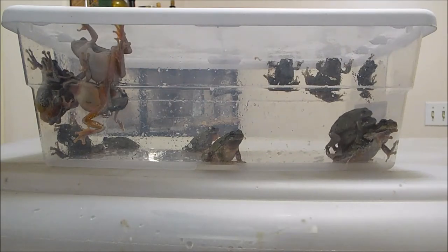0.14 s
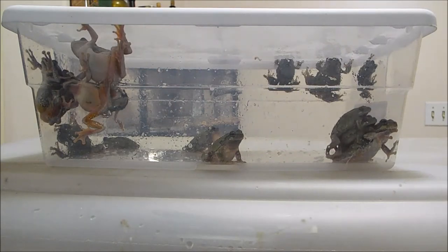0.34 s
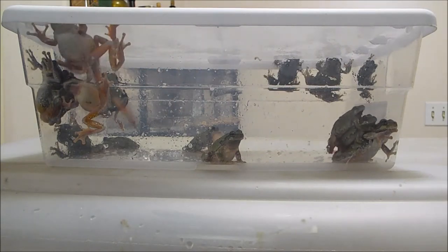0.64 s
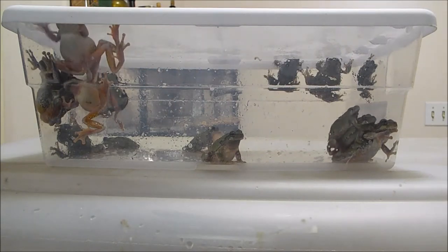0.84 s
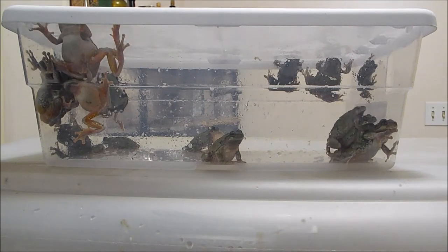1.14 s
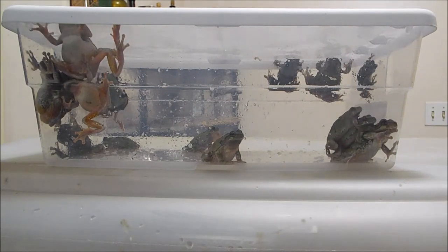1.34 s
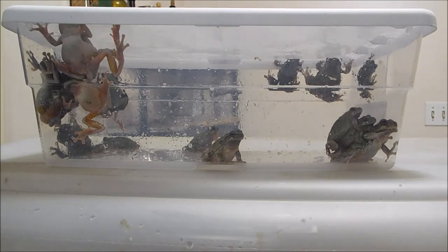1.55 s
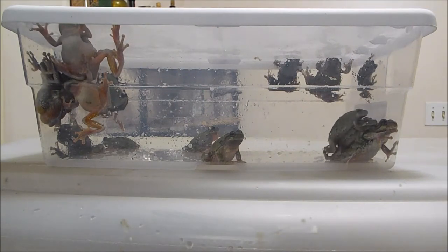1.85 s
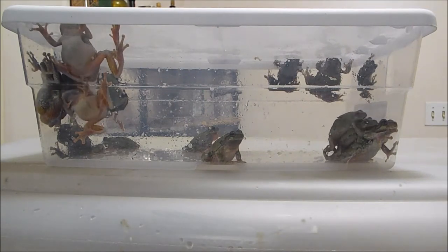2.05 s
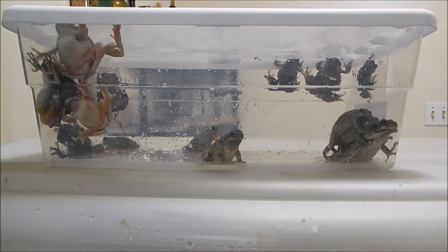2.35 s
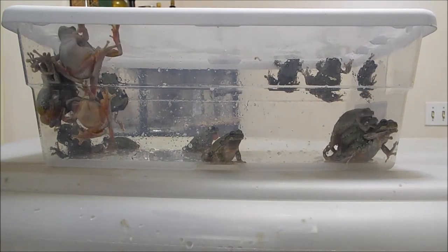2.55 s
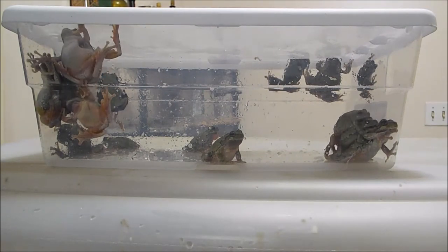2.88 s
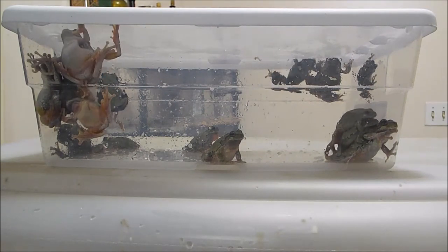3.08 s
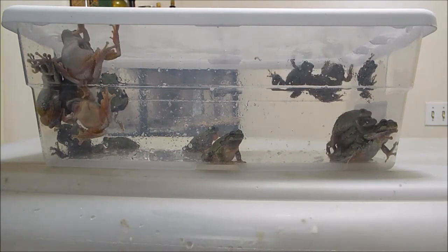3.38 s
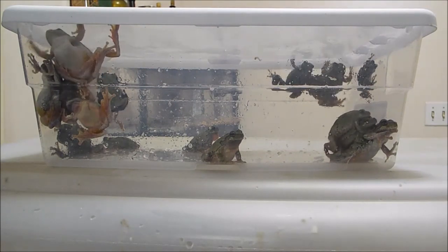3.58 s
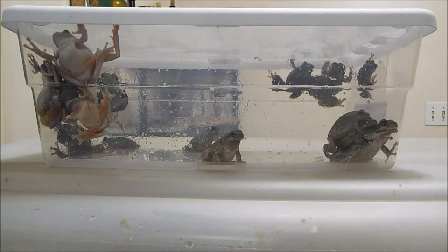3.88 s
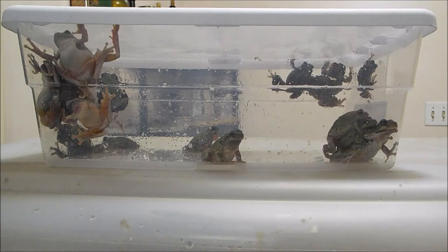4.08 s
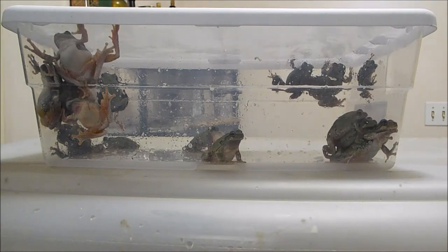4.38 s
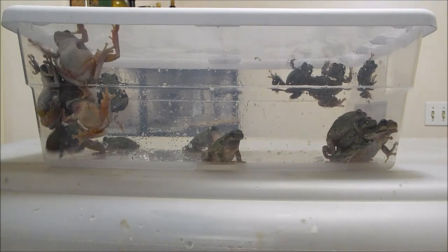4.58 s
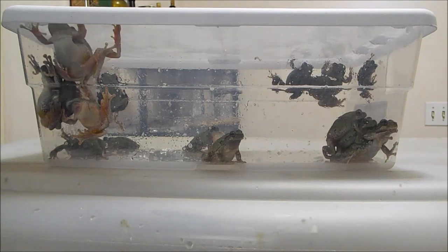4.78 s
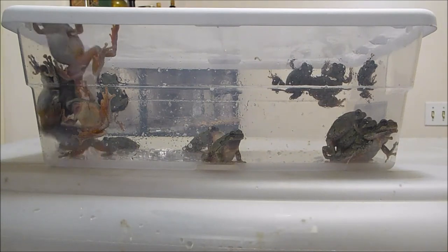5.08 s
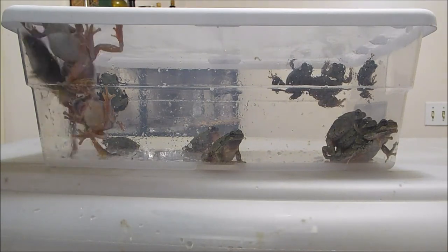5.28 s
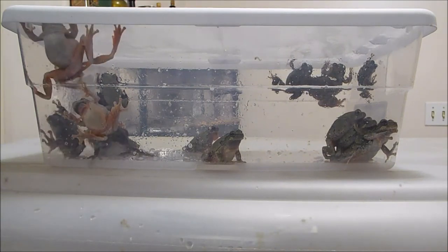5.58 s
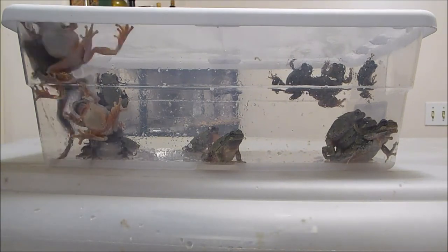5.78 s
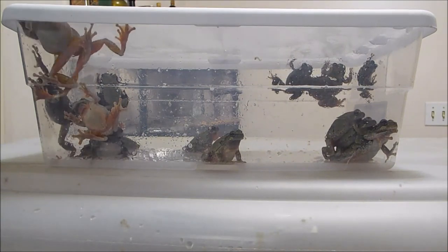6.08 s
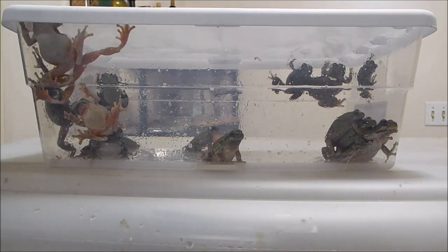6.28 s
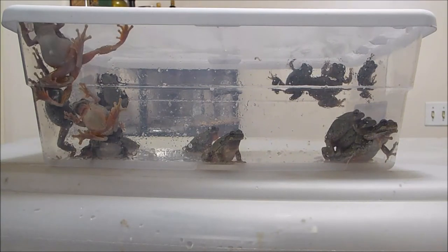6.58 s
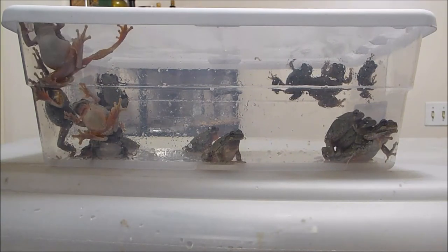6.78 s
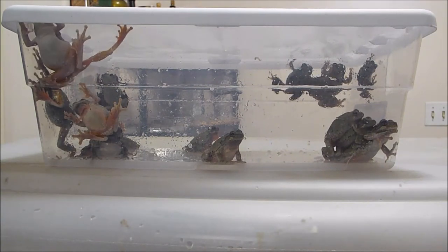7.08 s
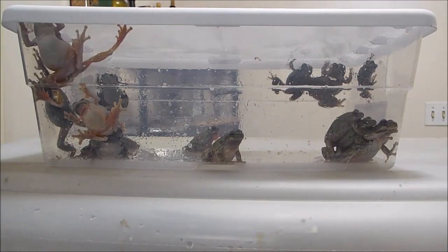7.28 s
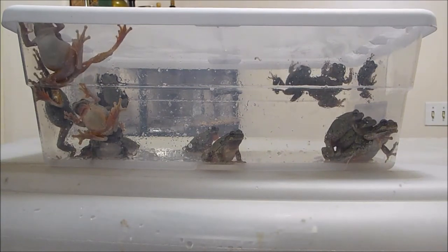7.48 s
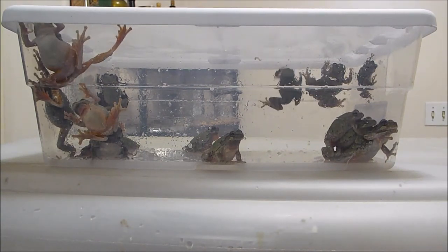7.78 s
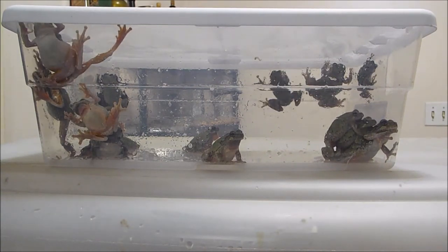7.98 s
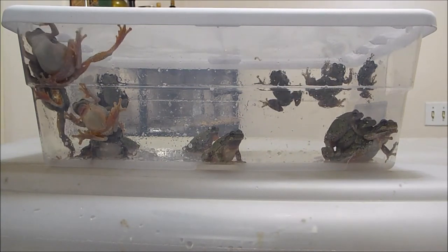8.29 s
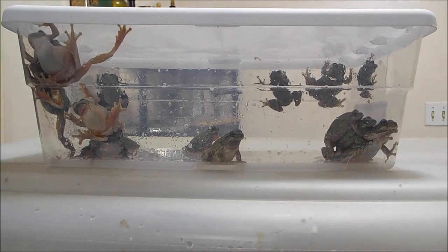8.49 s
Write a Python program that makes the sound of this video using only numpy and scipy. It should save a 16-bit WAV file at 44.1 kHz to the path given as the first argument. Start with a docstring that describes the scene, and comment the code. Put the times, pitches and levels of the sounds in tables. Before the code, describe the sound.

Tree frogs crowd a lidded plastic tub close to a stereo microphone in a small, hard, ringing room. Faint coloured noise, a low steady tone and a barely audible high whine lie beneath. Two quick peeps at 0.1 s lead into a very loud trill, about 0.3 to 1.3 s: some fifty snapping, gliding pulses a second, swelling in and slowing at the end. From 1.5 to 4.2 s short peeps, each a rasp tightening into a clear tone, repeat about every 0.2 s, with dry distant croaks and light wall knocks. A second loud trill runs from 4.15 to 5.2 s. Bodies bump the plastic and wet feet slip at 5.4 to 5.75 s. Two hoarse, throbbing squawks climb at 5.7 and 6.15 s, each under 0.2 s. Peeps continue about every quarter second from 6.6 s to the end, with faint knocks and sliding near 7.3 to 8.1 s.

```python
"""In a small, hard-walled room, tree frogs crowd in a lidded plastic tub close to the microphone.
One gives two loud trills (trains of gliding pulses that end in snaps) and two rising, throbbing squawks.
Others keep up short peeps (a rasp that locks into a tone) and croaks (unevenly rattling noise).
Bodies bump and knock the tub (noise bursts ringing its modes) and wet feet slide on it (grainy noise).
Beneath lie faint coloured noise and steady sine tones."""
import sys
import numpy as np
from scipy import signal
from scipy.fft import rfft, irfft, next_fast_len
from scipy.io import wavfile
from scipy.ndimage import uniform_filter1d, minimum_filter1d, map_coordinates

SR = 44100
rng = np.random.default_rng(int(sys.argv[2]) if len(sys.argv) > 2 else 0)


def output_pcm(signal):
    """Save a mono or channel-first signal as 16-bit PCM at the path in sys.argv[1].

    Samples are clipped to [-1, 1] before scaling.
    """
    pcm = np.clip(np.atleast_2d(signal).T, -1, 1) * 32767
    wavfile.write(sys.argv[1], SR, np.round(pcm).astype(np.int16))


N = 381024
TIME = np.arange(N) / SR  # s


def amp(db):
    """Decibel law: an amplitude ratio is ten to the power dB / 20."""
    return 10 ** (np.asarray(db) / 20)


def unit(x):
    """Normalisation to an effective (rms) value of 1."""
    return x / np.sqrt(np.mean(x ** 2) + 1e-20)


def along(points, hz):
    """Interpolation of (Hz, value) points along a logarithmic frequency axis."""
    f, value = np.transpose(points)
    return np.interp(np.log(hz + 1), np.log(f + 1), value)


def wobble(rate):
    """Band-limited random modulation: a smooth curve through `rate` random knots a second."""
    knots = rng.standard_normal(int(N * rate / SR) + 4)
    return map_coordinates(knots, [TIME * rate])


def filtered(x, response):
    """Linear filtering: the spectrum of x times a complex response of frequency."""
    n = x.shape[-1]
    padded = next_fast_len(n + 8192)
    spectrum = rfft(x, padded) * response(np.fft.rfftfreq(padded, 1 / SR))
    return irfft(spectrum, padded)[..., :n]


def noise(spectrum):
    """Spectral shaping: coloured noise of rms 1, falling away below its lowest point."""
    lowest = spectrum[0][0]
    colour = lambda hz: amp(along(spectrum, hz)) * np.minimum(hz / lowest, 1) ** 3
    return unit(filtered(rng.standard_normal(N), colour))


def resonances(modes, f):
    """Modal superposition: the causal responses of (Hz, width Hz, dB) resonators add up."""
    return sum(amp(db) * 1j * f * w / (c * c - f * f + 1j * f * w) for c, w, db in modes)


def gates(rows, edge):
    """Amplitude envelope: a level that opens and shuts with soft edges for each (s, length s, dB) row."""
    level = np.zeros(N)
    for start, length, db in rows:
        end = start + length + edge
        i = slice(*np.searchsorted(TIME, [start, end]))
        nearest_end = np.minimum(TIME[i] - start, end - TIME[i])
        level[i] += amp(db) * np.clip(nearest_end / edge, 0, 1)
    return level


def cords(pitch_hz, overtones, bright_db=0):
    """Harmonic series: vocal cords give a fundamental and overtones, which grow with brightness."""
    phase = 2 * np.pi * (np.cumsum(pitch_hz) / SR + rng.random())
    return sum(amp(db + (bright_db if k > 1 else 0)) * np.sin(k * phase) for k, db in overtones)


# Width of diffuse sound. Each row: frequency in Hz, side relative to mid in dB.
DIFFUSE_WIDTH = [(200, -22), (1100, -18), (2400, -16.5), (3000, -28.5), (3800, -9.5), (6000, 1.5),
                 (15000, -12)]


def stereo(mid, side):
    """Spatial coherence: two close ports hear alike in the bass and differently in the treble."""
    side = filtered(side, lambda hz: amp(along(DIFFUSE_WIDTH, hz)))
    return np.array([mid + side, mid - side])


# Reverberation of the room. Each row: frequency in Hz, time to fall by 60 dB in seconds.
DECAY_TIMES = [(200, 0.13), (600, 0.37), (1200, 0.4), (2500, 0.45), (4500, 0.4), (8000, 0.45),
               (15000, 0.12)]
# Colour of the diffuse tail. Each row: frequency in Hz, strength in relative dB.
TAIL_COLOUR = [(200, -8.5), (650, -8.5), (1100, 1.5), (2400, 3), (5000, 2.5), (9000, 1), (14000, -1)]
# Ringing air modes of the tub. Each row: frequency in Hz, width in Hz, strength in dB.
AIR_MODES = [(2486, 120, -6.5), (3770, 38, 0)]
# Echoes between facing hard surfaces. Each row: delay in seconds, level in dB before colouring.
FLUTTER_ECHOES = [(0.0137, -13), (0.0274, -14), (.0556, -19.5)]
# Colour of those echoes. Each row: frequency in Hz, level in dB.
ECHO_COLOUR = [(300, -12), (1100, -2), (2400, -3), (6000, -6)]


def room(x, wet_db):
    """Reverberation: direct sound, flutter echoes and a tail in which each frequency dies at its own speed."""
    hz, t, grid = signal.stft(rng.standard_normal((2, SR // 2)), SR, nperseg=256)
    decay = amp(-60 * t / along(DECAY_TIMES, hz)[:, None])
    tail = signal.istft(grid * decay, SR, nperseg=256)[1]
    tail_response = lambda f: amp(along(TAIL_COLOUR, f)) * (1 + resonances(AIR_MODES, f))
    tail = filtered(tail / np.linalg.norm(tail[0]), tail_response)
    echoes = sum(amp(db) * np.pad(x, (round(delay * SR), 0))[:N] for delay, db in FLUTTER_ECHOES)
    echoes = filtered(echoes, lambda f: amp(along(ECHO_COLOUR, f)))
    diffuse = signal.fftconvolve(x[None], stereo(*tail), axes=1)[:, :N]
    return x + echoes + amp(wet_db) * diffuse


# Spectrum of the room noise. Each row: frequency in Hz, density in relative dB.
FLOOR_COLOUR = [(15, -62.5), (25, -40), (50, -36), (90, -38), (150, -29.5), (199, -18.5), (587, -10.5),
                (654, -11.5), (1010, -15.5), (1280, -5), (1390, -16), (1680, -13), (2200, -23), (2450, -30),
                (3210, -22.5), (5650, -32.5), (15800, -33.5)]
# Steady room tones. Each row: frequency in Hz, level in dB rms.
ROOM_TONES = [(652, -63.5), (221, -74.5)]
WHINE_HZ, WHINE_DB = 15735, -81.5  # a thin, steady electronic whine, dB rms


def background(floor_db=-55):
    """Stationary sound: quiet coloured noise plus sines whose phase wavers slightly."""
    tones = 0
    for hz, db in ROOM_TONES + [(WHINE_HZ, WHINE_DB)]:
        tones = tones + amp(db) * unit(np.sin(2 * np.pi * hz * TIME + .25 * wobble(32)))
    return amp(floor_db) * stereo(noise(FLOOR_COLOUR), noise(FLOOR_COLOUR)) + tones


# Short notes. Each row: start in seconds, time to the peak in seconds, tone and rasp in relative dB.
PEEP_NOTES = [(0.127, .017, -19, -33), (.153, 0.0169, -26, -35), (1.461, 0.042, -38, -41),
              (1.708, 0.015, -21.5, -33.5), (1.889, .031, -19.5, -32.5), (2.086, 0.025, -23.5, -31.5),
              (2.291, 0.027, -18, -30.5), (2.504, 0.039, -21, -34), (2.729, 0.033, -25.5, -34),
              (2.948, .021, -28, -33.5), (3.126, .032, -17.5, -31), (3.361, .033, -27, -36),
              (3.547, 0.034, -32, -34), (3.785, 0.039, -30, -39.5), (3.993, 0.046, -26, -36.5),
              (4.152, 0.011, -22.5, -34), (5.685, 0.016, -22.5, -31.5), (6.119, 0.023, -19.5, -32.5),
              (6.602, 0.035, -30.5, -37), (6.834, 0.037, -28.5, -37), (7.085, 0.049, -19.5, -37.5),
              (7.332, .054, -21, -39), (7.615, .018, -41, -39.5), (7.84, .034, -18, -33.5),
              (8.095, 0.047, -22, -41.5), (8.354, 0.042, -21.5, -39.5), (8.61, 0.047, -25.5, -43)]
# Harmonics of the pure tone. Each row: multiple of the pitch, level in relative dB.
PEEP_HARMONICS = [(1, -3.5), (2, -57.5), (3, -24), (4, -27), (6, -39)]
# Harmonics of the buzz. Each row: multiple of the pitch, level in relative dB.
RASP_HARMONICS = [(1, 1.5), (2, 1), (3, -1), (4, -6.5), (6, -37)]
# Spectrum of the breathy part of the rasp. Each row: frequency in Hz, density in relative dB per Hz.
RASP_COLOUR = [(300, -17), (800, -43.5), (1050, 7), (1350, -11), (1650, 6), (2200, -6.5), (2750, -2.5),
               (3250, -18), (3800, -3), (4600, -12), (5600, -23), (8000, -37), (15000, -39)]
# Throat resonances of the peepers. Each row: frequency in Hz, width in Hz, strength in dB.
THROAT_MODES = [(1144, 130, 3.5), (2005, 39, -5.5), (3600, 370, -4), (4877, 120, 6)]
# A thin ring that the notes leave in the tub. Each row: frequency in Hz, width in Hz, strength in dB.
TUB_RING = [(4630, 14, 12.5)]
# pitch of a note of usual strength; that strength; louder notes are higher
PEEP_HZ, PEEP_DB, PEEP_HZ_PER_DB = 1120, -24, 2
LOCK_S, LEAD_DB = 0.0031, -15.5  # half-width of the pure tone; the fluttering lead-in relative to it
RASP_ROUGH, VOICED_SHARE = .028, .62  # pitch jitter (share); voiced share of the rasp's power
NOTE_SCATTER_DB, NOTE_DETUNE = 4, .025  # spread of overtone strength; spread of buzz pitch (share)


def peeps(glide=2.437, tone_db=0, rasp_db=-3, grain_db=3.0, slack=0.97):
    """Mode locking: each note starts as a rough rasp, then the cords lock into a brief rising tone."""
    voice, buzz = np.zeros((2, N))
    shake, flutter = RASP_ROUGH * wobble(1000), amp(4.6 * wobble(160))
    for start, rise, db, _ in PEEP_NOTES:
        i = slice(*np.searchsorted(TIME, [start, start + rise + 0.033]))
        t = TIME[i] - start - rise  # zero at the peak
        pitch = PEEP_HZ + PEEP_HZ_PER_DB * (db - PEEP_DB)
        detune, bright = rng.uniform(-0.85, 1, size=2)
        lock = np.exp(-.5 * (t / LOCK_S) ** 2)
        lead = np.sin(np.pi * np.clip(1 + t / rise, 0, 1)) ** 2
        hz = pitch * (1 + glide * t + (1 - lock) * shake[i])
        swell = amp(db + tone_db) * (lock + amp(LEAD_DB) * lead * flutter[i])
        voice[i] += swell * cords(hz, PEEP_HARMONICS, NOTE_SCATTER_DB * bright)
        # slack cords buzz a little lower
        slack_hz = slack * pitch * (1 + NOTE_DETUNE * detune + .5 * glide * t + shake[i])
        buzz[i] = unit(cords(slack_hz, RASP_HARMONICS))
    rows = [(start, rise + .004, db + rasp_db) for start, rise, _, db in PEEP_NOTES]
    level = gates(rows, edge=.01) * unit(amp(grain_db * wobble(450)))
    rasp = level * (np.sqrt(VOICED_SHARE) * buzz + np.sqrt(1 - VOICED_SHARE) * noise(RASP_COLOUR))
    throat = lambda x: filtered(x, lambda f: 1 + resonances(THROAT_MODES + TUB_RING, f))
    return room(throat(voice), wet_db=-10.5) + room(throat(rasp), wet_db=-4.5)


WARM_UP_PULSES, WARM_UP_POWER, TIRING_POWER = 6, 1.85, 4
# full pulse; how far below it the first one lies; extra effort at the end
TRILL_DB, WARM_UP_DB, LAST_PUSH_DB = -3, 24, 2.5
# settled pitch; how flat the first full pulse is; time to tighten
TRILL_HZ, TRILL_FLAT_HZ, TIGHTEN_S = 1234.3, 48.3, .085


def trill_pulses(start, count, spacing, lag):
    """Pulse-train timing, as (s, dB, Hz): the frog warms up, holds its pace, then slows and pushes harder."""
    k = np.arange(-WARM_UP_PULSES, count + 1)
    cold = (np.maximum(-k, 0) / WARM_UP_PULSES) ** WARM_UP_POWER
    tired = (np.maximum(k, 0) / count) ** TIRING_POWER
    due = start + k * spacing + lag * tired
    level_db = TRILL_DB - WARM_UP_DB * cold + LAST_PUSH_DB * tired
    pitch = TRILL_HZ - TRILL_FLAT_HZ * np.exp(-k * spacing / TIGHTEN_S)
    return zip(due, level_db, pitch)


# Trills. Each row: first full pulse in seconds, number of pulses after it, pulse spacing in seconds,
# lag built up by the last pulse in seconds.
TRILL_TIMES = [(.3933, 44, .01901, .0142), (4.2555, 46, .01881, .0183)]
# Harmonics of the trill. Each row: multiple of the pitch, level in relative dB.
TRILL_HARMONICS = [(1, -6), (2, -3), (3, -21.5), (4, -26), (5, -47), (6, -39), (7, -41.5), (8, -46)]
# The loud caller's resonances. Each row: frequency in Hz, width in Hz, strength in dB.
SAC_MODES = [(1050, 420, -0.5), (2588, 140, 7.5), (3724, 100, 17.5), (6150, 100, 9), (7550, 73, -10.5),
             (7900, 67, -2)]
# Spectrum of the grating cords. Each row: frequency in Hz, density in relative dB per Hz.
GRATE_COLOUR = [(600, -30.5), (1000, 2), (1600, -11), (2100, 8.5), (2800, 11), (3350, -16.5), (4000, 4),
                (5000, -26), (5800, -20.5), (15000, -54)]
# Spectrum of the closing snap. Each row: frequency in Hz, level in relative dB.
SNAP_COLOUR = [(20, -81), (70, -46.5), (120, -30), (220, -26.5), (450, -8), (800, -0.5), (1500, 7),
               (3000, 9), (6000, -27), (10000, -27), (15000, -28)]
# full-effort pulse: rise and fall widths in s before scatter, pitch glide (share) and its time in s
PULSE_RISE, PULSE_FALL, PULSE_GLIDE, GLIDE_TIME = .0016, .0012, .055, .002
SIZE_SCATTER_DB, SNAP_SCATTER_DB, TIME_SCATTER = .7, 7, .0005  # pulse-to-pulse spread; time in s


def trills(soft_rise=0.0028, full_db=-5, brighten=8.2, voice_db=-9.5, grate_db=-19, snap_db=-0.5):
    """Pulsed phonation: each pulse swells, glides up and shuts; harder ones are shorter and snap harder."""
    voice, swell, snaps = np.zeros((3, N))
    t = np.arange(-SR // 80, SR // 80) / SR
    for row in TRILL_TIMES:
        for due, db, pitch in trill_pulses(*row):
            size, tune, sharp, late = rng.uniform(-1, 1, size=4)
            at = due + TIME_SCATTER * late
            slack_db = min(db - full_db, 0)
            effort = amp(slack_db)
            hard_width = np.where(t < 0, PULSE_RISE, PULSE_FALL)
            width = (effort * hard_width + (1 - effort) * soft_rise) * amp(-2 * sharp)
            hz = pitch * (1 + .022 * tune + PULSE_GLIDE * effort * np.tanh(t / GLIDE_TIME))
            i = round((at + t[0]) * SR) + np.arange(len(t))
            pulse = amp(db + SIZE_SCATTER_DB * size) / np.cosh(t / width)
            voice[i] += pulse * cords(hz, TRILL_HARMONICS, max(brighten * slack_db, -12))
            swell[i] += pulse
            snaps[round(at * SR)] = amp(db + 2 * slack_db + snap_db + SNAP_SCATTER_DB * sharp)
    voice = amp(voice_db) * filtered(voice, lambda f: 1 + resonances(SAC_MODES, f))
    # the cords grate while they are open
    grating = amp(grate_db) * swell * noise(GRATE_COLOUR)
    snaps = filtered(snaps, lambda f: amp(along(SNAP_COLOUR, f)))
    return room(voice + grating + snaps, wet_db=-4.3)


# Hoarse croaks from further back. Each row: start in seconds, length in seconds, level in relative dB.
CROAK_TIMES = [(1.49, 0.018, -43), (2.12, 0.016, -33.5), (2.364, 0.019, -33), (2.872, 0.068, -38),
               (3.17, 0.021, -34.5), (3.40, 0.018, -29), (3.475, 0.0062, -48), (3.672, 0.044, -35.5),
               (3.95, 0.025, -37), (5.448, 0.017, -36.5)]
# Spectrum of a croak. Each row: frequency in Hz, density in relative dB per Hz.
CROAK_COLOUR = [(300, -29), (850, -26.5), (1150, -4.5), (1650, -4), (2100, -4.5), (2700, -24.5),
                (3400, -8.5), (4300, -21.5), (6000, -39.5), (15000, -63)]


def croaks(grain_db=4, gain_db=-3):
    """Aperiodic phonation: slack cords rattle unevenly, with no clear pitch."""
    rattle = unit(noise(CROAK_COLOUR) * amp(grain_db * wobble(350)))
    return room(amp(gain_db) * gates(CROAK_TIMES, edge=0.0056) * rattle, wet_db=-1.5)


def blows(rows, modes, contact):
    """Impact excitation: soft bodies shake the plastic for a moment and its modes ring."""
    push = sum(amp(db) * np.exp(-np.abs(TIME - s) / contact) * (TIME >= s) for s, db in rows)
    band = lambda f: np.minimum(f / 190, 1) ** 3 / (1 + (f / 3000) ** 2)
    ring = lambda x: filtered(x, lambda f: resonances(modes, f) * band(f))
    shake = rng.standard_normal(N)
    return ring(push * shake) / np.std(ring(shake))


# Bodies bump the tub. Each row: time in seconds, level in relative dB.
BUMP_TIMES = [(5.366, -28), (5.49, -31.5), (5.513, -29.5), (5.723, -27), (5.738, -24)]
# Modes of the tub. Each row: frequency in Hz, width in Hz, strength in relative dB.
TUB_MODES = [(140, 44, -10), (348, 30, 4), (476, 320, -6), (693, 190, 2.5), (1060, 110, 10)]
# Light knocks on the wall. Each row: time in seconds, level in relative dB.
KNOCK_TIMES = [(1.668, -30.5), (1.81, -31), (3.69, -34.5), (3.85, -37), (3.90, -37), (7.257, -35),
               (7.282, -48), (7.413, -35.5), (7.452, -36)]
# Modes of the tub wall. Each row: frequency in Hz, width in Hz, strength in relative dB.
WALL_MODES = [(500, 27, 27.5), (1290, 110, 23), (1530, 91, 3)]
# Wet feet slap and slide. Each row: start in seconds, length in seconds, level in relative dB.
SLIDE_TIMES = [(2.515, 0.052, -49), (5.37, .014, -39), (5.511, 0.01, -30), (5.732, 0.007, -28),
               (7.405, 0.041, -35), (8.10, .074, -46.5)]
# Spectrum of the wet slides. Each row: frequency in Hz, level in relative dB.
WET_COLOUR = [(200, -41.5), (700, -12.5), (1400, 7), (2500, 3), (3800, 7), (5500, -5), (9000, -10.5),
              (15000, -26)]


def scramble(bump_db=-2, knock_db=0, slide_db=-2):
    """Impact and friction: frogs bump the tub, knock its wall and slip on the wet plastic."""
    bumps = amp(bump_db) * blows(BUMP_TIMES, TUB_MODES, contact=0.019)
    knocks = amp(knock_db) * blows(KNOCK_TIMES, WALL_MODES, contact=0.0023)
    grains = unit(rng.standard_normal(N) * amp(1.5 * wobble(600)))
    slides = gates(SLIDE_TIMES, edge=0.0074) * grains
    slides = filtered(slides, lambda f: amp(along(WET_COLOUR, f) + slide_db))
    return room(bumps + knocks + slides, wet_db=-6.5)


# Squawks. Each row: start in seconds, length in seconds, level in relative dB.
SQUAWK_TIMES = [(5.73, .176, -14), (6.151, .16, -12.5)]
# Harmonics of the squawk. Each row: multiple of the pitch, level in relative dB.
SQUAWK_HARMONICS = [(1, -8.5), (2, -6.5), (3, -17), (4, -22), (5, -34), (6, -50.5), (7, -36.5), (8, -43)]
# Resonances the harmonics sweep through. Each row: frequency in Hz, width in Hz, strength in dB.
SQUAWK_MODES = [(1078, 54, 11.5), (2030, 210, 5), (3650, 190, 1)]
# Spectrum of the hoarse breath. Each row: frequency in Hz, density in relative dB per Hz.
HOARSE_COLOUR = [(250, -3), (800, -8), (1200, -6), (2300, 4.5), (3300, -5.5), (5000, 4.5), (5900, -17),
                 (7500, -6.5), (9000, -33), (15000, -25)]
# Hard pulses that close each cry. Each entry: time before its end in seconds.
HEAVE_TIMES = [.046, 0.0042]
HEAVE_S, HEAVE_DB = 0.0013, 1  # half-width and strength of a heave
# opening pitch; slow rise over the cry; final climb and its length
SQUAWK_HZ, SQUAWK_RISE_HZ, CLIMB_HZ, CLIMB_S = 962, 95.6, 213.7, .062
# onset, cut-off, growth over the cry
SQUAWK_ATTACK_S, SQUAWK_RELEASE_S, SQUAWK_SWELL_DB = 0.007, 0.0036, 2.5
# pitch jitter (share), throb depth, hoarse noise relative to the cry, pitch bend per throb (share)
SQUAWK_ROUGH, THROB_DB, HOARSE_DB, THROB_BEND = .021, 4.5, -27, .02
DULL_DB, BRIGHTEST_AT = 8, 0.56  # overtones start this much weaker; share of the cry at which they peak
SAC_CUT_HZ = 1027  # the small sac radiates little below this


def squawks(throb_hz=92, sac_db=-7, snap_db=0):
    """Amplitude modulation: pulses run together into a throbbing cry that climbs and ends in two heaves."""
    voice, snaps = np.zeros((2, N))
    cycle = 2 * np.pi * np.cumsum(throb_hz * (1 + 0.127 * wobble(40))) / SR
    jitter = 1 + SQUAWK_ROUGH * wobble(700) + THROB_BEND * np.sin(cycle)
    hoarse = amp(HOARSE_DB) * unit(noise(HOARSE_COLOUR) * amp(3 * wobble(500)))
    for start, length, db in SQUAWK_TIMES:
        i = slice(*np.searchsorted(TIME, [start, start + length + SQUAWK_RELEASE_S]))
        t = TIME[i] - start
        climb = np.clip(1 + (t - length) / CLIMB_S, 0, 1) ** 2
        pitch = SQUAWK_HZ + SQUAWK_RISE_HZ * t / length + CLIMB_HZ * climb
        release = 1 + (length - t) / SQUAWK_RELEASE_S
        gate = np.clip(np.minimum(t / SQUAWK_ATTACK_S, release), 0, 1)
        level_db = db + SQUAWK_SWELL_DB * (t / length - 1) + THROB_DB * np.cos(cycle[i])
        for before in HEAVE_TIMES:
            level_db += HEAVE_DB / np.cosh((t - length + before) / HEAVE_S)
            snaps[round((start + length - before) * SR)] = amp(snap_db)
        bright_db = -DULL_DB * (1 - t / (BRIGHTEST_AT * length)) ** 2
        cry = cords(pitch * jitter[i], SQUAWK_HARMONICS, bright_db) + hoarse[i]
        voice[i] = gate * amp(level_db) * cry
    radiated = lambda f: 1 - 1 / (1 + (f / SAC_CUT_HZ) ** 14)
    resonant = lambda f: 1 + amp(sac_db) * resonances(SAC_MODES, f) + resonances(SQUAWK_MODES, f)
    voice = filtered(voice, lambda f: radiated(f) * resonant(f))
    snaps = filtered(snaps, lambda f: amp(along(SNAP_COLOUR, f)))
    return room(voice + snaps, wet_db=-6.0)


def scene():
    """Interaural-style differences: the right port hears everything a little earlier and louder."""
    sound = background() + peeps() + trills() + croaks() + scramble() + squawks()
    sides = np.array([[-1], [1]])  # left, right
    # 0.68 dB and 6 microseconds to either side
    return filtered(sound, lambda f: amp(0.68 * sides) * np.exp(2j * np.pi * f * sides * 6e-6))


CEILING, TOP_HZ = .88, 15850  # limiter ceiling (share of full scale); band limit


def record(dry):
    """Peak limiting and band limiting: a fast gain holds the loudest pulses; the top band is cut."""
    needed = np.minimum(1, CEILING / (np.abs(dry).max(axis=0) + 1e-9))
    gain = uniform_filter1d(minimum_filter1d(needed, size=129), size=129)
    return filtered(dry * gain, lambda hz: hz < TOP_HZ)


dry = scene()
out = record(dry)
output_pcm(out)
```